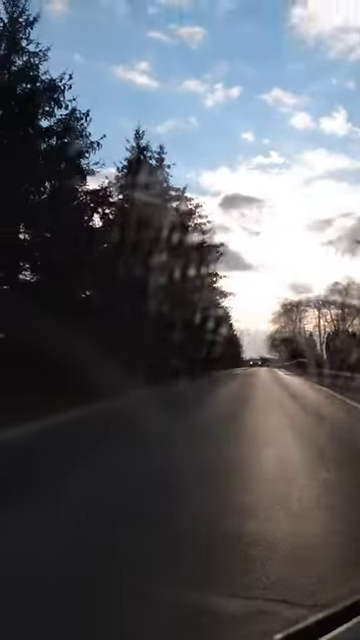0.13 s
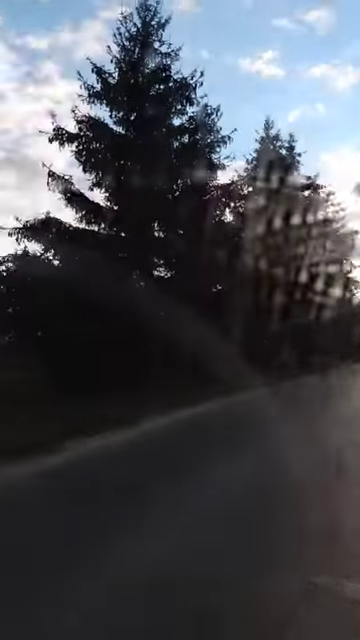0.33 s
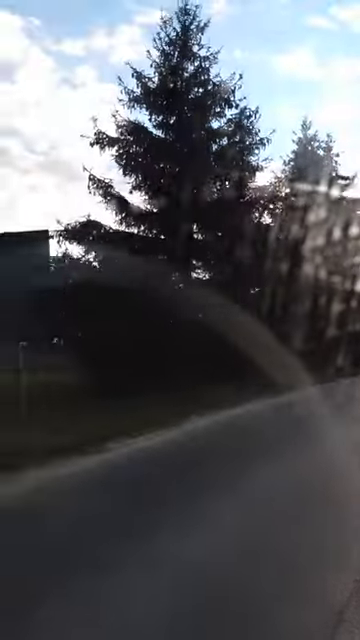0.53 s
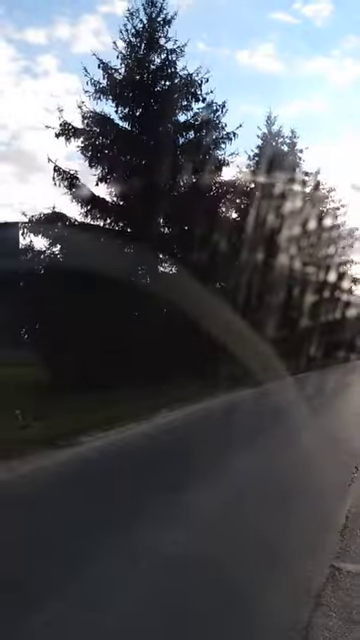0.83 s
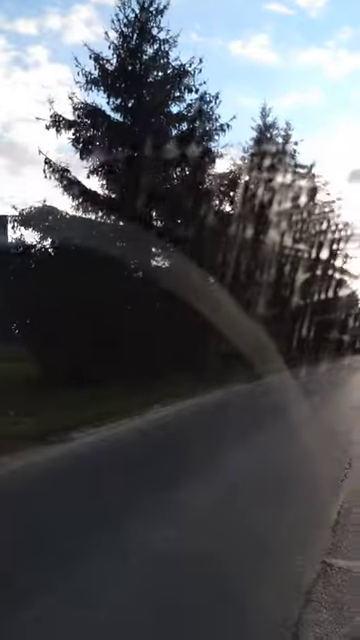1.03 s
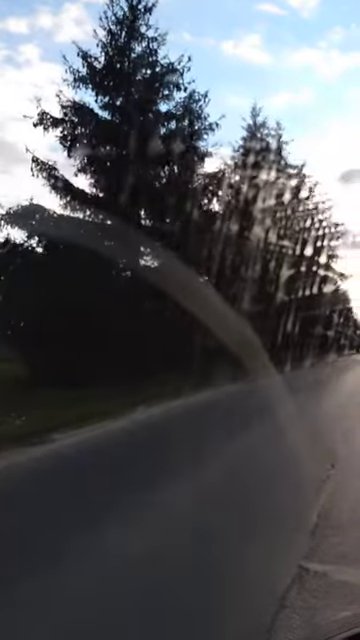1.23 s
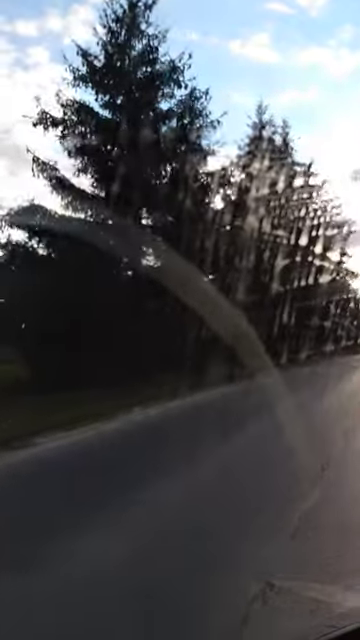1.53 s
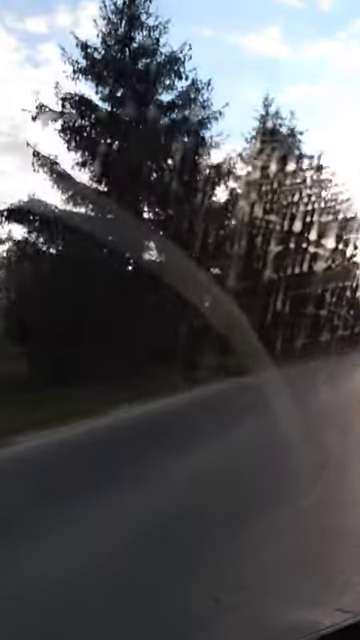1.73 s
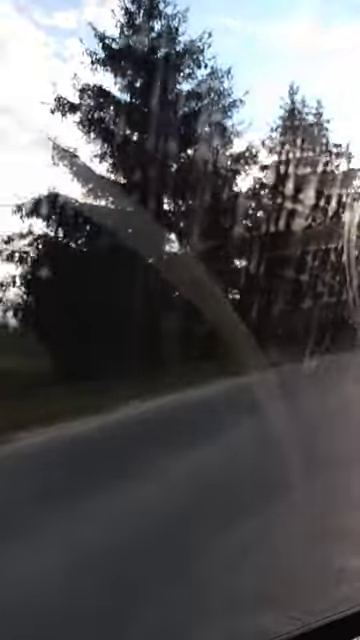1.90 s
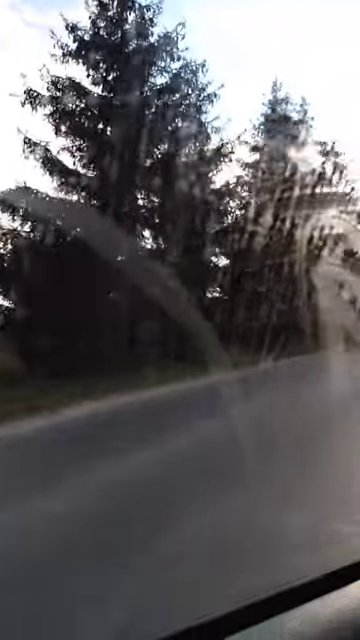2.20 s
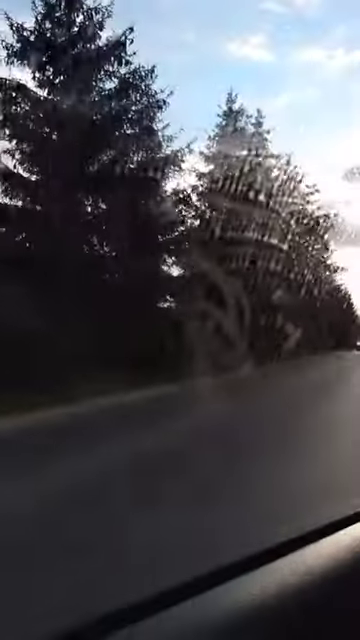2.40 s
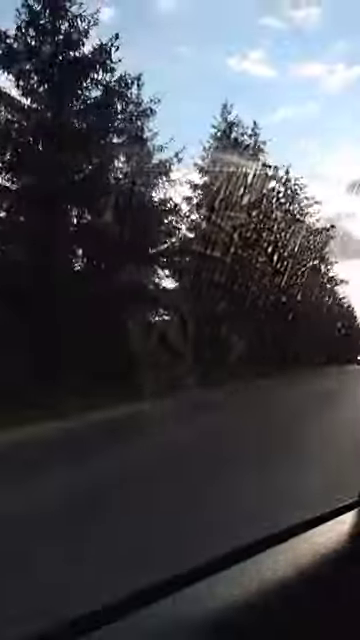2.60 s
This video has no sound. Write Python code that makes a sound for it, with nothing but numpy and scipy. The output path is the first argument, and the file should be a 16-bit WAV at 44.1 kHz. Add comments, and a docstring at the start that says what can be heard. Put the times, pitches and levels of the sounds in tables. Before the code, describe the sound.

Car engine booming low inside the cabin, idling then revving up, with one sharp click

```python
"""Inside a slow car, heard by a handheld phone. The engine idles at first, while cloth rustles (swishes of noise)
and dull jolts (short low thuds) pass. It then rises, eases and pulls again, as waves at multiples of its firing
rate that boom in the cabin. Small ticks (impulses with noisy tails) join in, and near two seconds one sharp
click (a sudden step). Road rumble and faint hiss (shaped noise), soft hums and tiny knocks last throughout."""
import sys
import numpy as np
from scipy import signal
from scipy.fft import rfft, irfft
from scipy.io import wavfile
from scipy.ndimage import uniform_filter1d

SR = 44100
rng = np.random.default_rng(int(sys.argv[2]) if len(sys.argv) > 2 else 0)


def bounce(signal):
    """Save signal as a 16-bit WAV file at the path given by the first command-line argument."""
    frames = np.transpose(np.atleast_2d(signal))
    limited = np.clip(frames, -1, 1)
    pcm = np.round(limited * 32767).astype(np.int16)
    wavfile.write(sys.argv[1], SR, pcm)


N = 121275

# The engine over time. Each row: time in seconds, firing rate in Hz, engine level in dB,
# level of the wave at the firing rate in dB, level of the wave at three times that rate in dB.
ENGINE_PATH = [(0.0, 31.3, -38, -34.5, -52), (0.1, 32.26, -48, -62, -54), (0.21, 30.82, -40, -67, -35.5),
               (0.27, 31.98, -36, -71, -60), (0.31, 31.73, -37, -50, -42), (0.36, 31.4, -47, -60, -46),
               (0.53, 30.3, -55, -68, -56), (0.65, 29.4, -55, -67, -55.5), (0.75, 28.96, -35.5, -54, -29),
               (0.79, 29.15, -45.5, -59, -65), (0.87, 30.74, -29, -53, -30), (0.96, 33.46, -38, -53, -45),
               (0.98, 34.33, -26, -35, -33.5), (1.111, 41.8, -34, -34.5, -42.5),
               (1.25, 44.9, -28, -33, -40.5), (1.401, 42.07, -31.5, -40, -38), (1.6, 34.5, -28, -36, -38),
               (1.7, 31.13, -32, -41, -38.5), (1.82, 30.68, -39, -42, -46.5), (1.88, 31.5, -40, -50, -42),
               (1.97, 33.5, -31, -40, -39), (2.06, 35.9, -25, -39, -34), (2.11, 37.2, -29, -38, -33),
               (2.16, 38.7, -23, -36, -36), (2.241, 40.99, -31, -37, -35), (2.38, 45, -24, -32, -40),
               (2.45, 47, -28, -32, -42), (2.53, 49.47, -23.5, -26.5, -42.5), (2.56, 51, -31.5, -30, -56.5),
               (2.63, 53.15, -29.5, -26, -40), (2.75, 54.08, -33.5, -30.5, -35.5)]
# Uneven firing. Each row: time in seconds, extra strength of the half multiples in dB.
UNEVEN_FIRING = [(0, -5), (.9, 11.5), (1.1, 2), (1.3, -1), (1.55, 6), (2.0, -0.5), (2.3, -2), (2.5, -2.5),
                 (2.6, 15), (2.75, 7.5)]
# The other engine waves. Each row: multiple of the firing rate, strength in dB added to the engine level,
# lag behind the pulse in radians.
ENGINE_MULTIPLES = [(1.5, -20.5, 0.13), (2, -1, 0.96), (2.5, -26, 0.13), (3.5, -28.5, .1), (4, -11.5, 2.06),
                    (4.5, -24, .1), (5, -18.5, 0.098), (5.5, -25, .1), (6, -22, 2.95), (7, -26.5, 0.089)]
# How the cabin colours those other waves. Each row: frequency in Hz, gain in dB.
CABIN_COLOUR = [(28, -20.5), (40, -9), (52, 6), (68, 0.5), (88, 2.5), (110, 0.5), (140, -1.5), (185, -1.5),
                (213, -9), (235, -1.5), (300, -0.5), (450, 1.5)]
PHASE_WANDER, WANDER_HZ = 0.17, 25  # rms radians per multiple; fastest wander
WAVER_DB, WAVER_HZ = 2.5, 12  # rms level waver; fastest waver of level and rate
JITTER = 0.0072  # rms waver of the rate, as a fraction of it
THIRD_LAG = 1.51  # radians behind the pulse
ENGINE_PAN_DB, ENGINE_LAG = -0.5, .12  # first port over second in dB; second behind first in radians

# One sharp click: time in seconds, height of the downward jump in dB, build-up and relaxing times in seconds.
CLICK_S, CLICK_DB, CLICK_BUILD_S, CLICK_RELAX_S = 1.987, -17.5, 0.0013, 0.0024

# Cloth rustles. Each row: centre in seconds, length with its fades in seconds, level in dB,
# brightest frequency in Hz, width in octaves, first port over second in dB.
CLOTH_RUSTLES = [(0.245, 0.19, -64.5, 10900, 0.36, -8.5), (0.411, 0.22, -56.5, 3950, 6.3, -3),
                 (0.415, 0.19, -61.5, 1330, 0.5, -3), (0.618, 0.16, -48.5, 11000, 0.68, -2),
                 (0.611, 0.078, -53, 5940, 0.49, -3), (0.638, 0.022, -56, 1750, 0.4, 0),
                 (0.69, .06, -65, 1800, .4, -2), (1.103, 0.13, -63.5, 10400, 0.48, -7),
                 (1.379, 0.08, -65, 2482, 1.2, -1), (1.438, 0.23, -68.5, 11200, 0.27, -10),
                 (1.534, 0.075, -56.5, 9230, 2, -3), (0.76, 0.17, -73, 1720, .5, -3),
                 (1.828, 0.1, -67, 1900, 0.4, -2.2), (1.96, 0.091, -66, 10750, 0.46, -9)]
RUSTLE_EDGE, RUSTLE_GRAIN_DB = 3.2, 2.2  # steepness of the fades; rms roughness in dB

# Small ticks. Each row: start in seconds, peak level before panning in dB, brightest frequency in Hz,
# width in octaves, first port over second in dB.
SMALL_TICKS = [(.8106, -44.5, 8000, 1.34, -3), (.83, -49, 2200, 1.02, -3), (.886, -47, 900, 1.27, -3),
               (.944, -48.5, 700, 0.97, -3), (1.0131, -39.5, 7214, 4.28, 0), (1.035, -43, 12500, 0.7, -7),
               (1.1842, -44, 7900, 1.02, -2.2), (1.188, -46, 2800, .6, -5), (1.009, -46, 900, 0.86, -1),
               (0.33, -61, 1360, 0.54, -3), (1.234, -42.5, 595, 0.46, -5), (1.7609, -44.5, 10780, 0.41, -7),
               (1.856, -51.5, 6785, 0.39, 0), (2.552, -58.5, 6003, 0.58, -5.5),
               (2.147, -45, 8980, 0.59, -9), (2.166, -44, 7200, 1.07, 3)]
TICK_TAIL_S, TICK_TAIL_DB = 0.016, -11  # time to fall 60 dB; tail's starting level against the impulse

# Dull jolts through the body. Each row: centre in seconds, length in seconds, level in dB,
# brightest frequency in Hz, width in octaves.
DULL_JOLTS = [(0.201, 0.052, -44, 62, 0.33), (0.53, 0.074, -41, 81, 0.27), (1.1, 0.16, -40, 118, 0.43),
              (1.38, 0.076, -49.5, 348, 0.16), (0.64, 0.038, -56.5, 760, 0.39), (.075, 0.05, -54, 420, 0.2),
              (0.28, 0.06, -39.5, 137, 0.52), (.358, 0.032, -43, 257, 0.74), (.39, 0.069, -49.5, 250, 0.4),
              (0.829, 0.022, -49, 473, 0.58), (1.1, 0.059, -48, 394, 0.67), (1.09, 0.024, -57, 640, 0.31),
              (2.07, 0.05, -51, 500, 0.6), (2.16, 0.11, -50, 440, .5), (2, 0.053, -48.5, 470, 0.2),
              (1.57, 0.038, -44, 164, 0.27), (1.85, 0.035, -51, 170, 0.34), (2.9, 0.16, -52.5, 300, 0.38)]

# Small knocks: how many per second at each port, overall level in dB, spread of sizes in dB,
# brightest frequency in Hz, width in octaves.
KNOCKS_PER_S, KNOCK_DB, KNOCK_SPREAD_DB, KNOCK_HZ, KNOCK_OCTAVES = 70, -66, 2.5, 650, .6

# Tone of the road rumble and hiss. Each row: frequency in Hz, relative strength per Hz in dB.
ROAD_TONE = [(14, -40.5), (24, -28), (36, -15.5), (55, -10), (88, -9.5), (130, -14), (190, -22),
             (300, -21.5), (440, -28.5), (620, -40), (800, -44.5), (1100, -49), (1700, -48), (2600, -52),
             (4500, -56.5), (7000, -60.5), (10500, -56.5), (15800, -55)]
ROAD_DB = -37.5  # overall level
# Road swells; only the movement around each column's average is used. Each row: time in seconds,
# then levels in dB of the deep rumble, the low rumble, the middle, the upper middle and the treble.
ROAD_SWELLS = [(0.0, -62.5, -50, -59.5, -71, -68), (0.21, -66.5, -54.5, -55.5, -69.5, -68),
               (0.42, -66.5, -48, -52, -64, -64.5), (0.53, -67.5, -54, -60, -68, -64),
               (0.66, -62, -46.5, -52.5, -64, -65.5), (0.78, -68.5, -45, -54.5, -68.5, -68),
               (0.9, -58.5, -47, -48.5, -75, -70.5), (1.07, -56, -46, -47.5, -67.5, -66),
               (1.28, -78, -45, -52, -67, -67.5), (1.51, -66.5, -48.5, -51, -67.5, -65.5),
               (1.64, -65, -46, -49, -68.5, -69.5), (1.77, -52, -42.5, -51.5, -68, -69),
               (1.89, -57, -47, -55.5, -68.5, -66.5), (2.03, -59, -48, -49, -71.5, -67),
               (2.15, -63, -45.5, -48, -72, -69), (2.3, -61, -41, -51.5, -67.5, -68.5),
               (2.45, -62, -38.5, -52.5, -72, -72), (2.75, -58, -40, -52, -63.5, -69.5)]
# The frequency in Hz where each of those five levels rules, in one list.
SWELL_HZ = [75, 180, 500, 1800, 6000]
PATCH_DB = 1.5  # rms patchiness of the noise
# How alike the road is at the two ports. Each row: frequency in Hz, likeness from 0 to 1.
PORT_LIKENESS = [(60, 1), (130, 0.94), (290, 0.96), (640, 0.53), (1400, 0.09), (3100, 0.13), (6800, 0.042),
                 (15000, .05)]
# Which side the road leans to. Each row: frequency in Hz, first port over second in dB.
ROAD_LEAN = [(60, 0), (250, -0.5), (640, 0), (1400, -5), (3100, -0.5), (6000, -1.5), (9500, -4),
             (12500, -1.3), (15500, 4)]
# Steady hums of the cabin. Each row: frequency in Hz, width in Hz, level in dB.
CABIN_HUMS = [(241.4, 13, -53), (182.3, 9.4, -51)]

MIC_LOW_HZ, EDGE_HZ = 30.6, 15830  # below the first and above the second the sound fades out


def amp(db):
    """Turn decibels into a plain multiplier."""
    return 10 ** (np.asarray(db) / 20)


def evened(x):
    """Scale a sound to an rms of 1."""
    return x / np.sqrt(np.mean(x ** 2) + 1e-20)


def read(points, hz):
    """Read a curve at any frequency, along a log-frequency axis."""
    f, value = np.transpose(points)
    return np.interp(np.log(hz + 1), np.log(f + 1), value)


def add(mix, s, sound):
    """Lay a sound into the mix from time s, cut off at the end."""
    part = mix[:, round(s * SR):][:, :sound.shape[1]]
    part += sound[:, :part.shape[1]]


def drift(top_hz):
    """Slow random wander of rms 1: 24 slow waves with random starting points."""
    t = np.arange(0, N + 256, 256) / SR
    f = np.geomspace(top_hz / 12, top_hz, num=24)
    start = rng.random(24)
    waves = np.sin(2 * np.pi * (f * t[:, None] + start))
    return np.interp(np.arange(N) / SR, t, evened(waves.sum(1)))


def coloured(x, hz, octaves):
    """Keep a bell-shaped band on a log-frequency axis."""
    f = np.fft.rfftfreq(x.shape[-1], 1 / SR) + 1
    bell = np.exp(-.5 * abs(np.log2(f / hz) / octaves) ** 3)
    return irfft(rfft(x) * bell, x.shape[-1])


def panned(pan_db):
    """Gains of the two ports, pan_db apart."""
    return amp([[pan_db / 2], [-pan_db / 2]])


def engine():
    """Firing pulses make waves at multiples of the firing rate; the cabin colours all but the first and third."""
    s, rate, level_db, lowest_db, third_db = np.transpose(ENGINE_PATH)
    t = np.arange(N) / SR
    rate = np.interp(t, s, rate) * (1 + JITTER * drift(WAVER_HZ))
    turn = 2 * np.pi * np.cumsum(rate) / SR
    ports = np.array([[ENGINE_LAG / 2], [-ENGINE_LAG / 2]])
    lowest_gain = amp(np.interp(t, s, lowest_db) + WAVER_DB * drift(WAVER_HZ))
    out = lowest_gain * np.cos(turn + ports / 2)  # only half the lag between ports here
    third_gain = amp(np.interp(t, s, third_db) + WAVER_DB * drift(WAVER_HZ))
    out += third_gain * np.cos(3 * turn - THIRD_LAG + ports)
    uneven_db = np.interp(t, *np.transpose(UNEVEN_FIRING))
    for k, db, lag in ENGINE_MULTIPLES:
        cabin_db = read(CABIN_COLOUR, k * rate)
        gain = amp(np.interp(t, s, level_db) + db + cabin_db + WAVER_DB * drift(WAVER_HZ))
        gain *= amp((k % 1 > 0) * uneven_db)  # half multiples only
        wandering_turn = turn + PHASE_WANDER * drift(WANDER_HZ)
        out += gain * np.cos(k * wandering_turn - lag + ports)
    return np.sqrt(2) * out * panned(ENGINE_PAN_DB)  # sqrt(2) makes the wave levels rms


def click():
    """The signal builds up, jumps down at once and relaxes, alike at both ports."""
    t = np.arange(N) / SR - CLICK_S
    before = np.exp(-abs(t) / CLICK_BUILD_S)
    after = -np.exp(-abs(t) / CLICK_RELAX_S)
    return amp(CLICK_DB) / 2 * np.where(t < 0, before, after)


def rustle(centre, length, db, hz, octaves, pan_db, noise):
    """Cloth makes a grainy swish of noise, partly different at each port."""
    u = np.linspace(-1, 1, len(noise))
    shape = np.exp(-abs(u * len(noise) / SR / length) ** RUSTLE_EDGE * 2 ** RUSTLE_EDGE)
    grain = amp(RUSTLE_GRAIN_DB * evened(uniform_filter1d(noise[:, 3], size=120)))
    swish = coloured(noise[:, :2].T + 0.08 * noise[:, 2], hz, octaves)
    return amp(db) * evened(swish * grain) * shape * panned(pan_db)


def tick(db, hz, octaves, pan_db, noise):
    """One short impulse with a brief noisy tail."""
    t = np.arange(len(noise)) / SR
    blow = amp(TICK_TAIL_DB - 60 * t / TICK_TAIL_S) * noise.T
    blow[:, 0] = 1  # the impulse
    blow = coloured(np.roll(blow, 256, axis=1), hz, octaves)  # room for the filter to ring before it
    return amp(db) * blow / abs(blow).max() * panned(pan_db)


def jolt(centre, length, db, hz, octaves, noise):
    """A short dull thud: a band of noise that swells and fades, partly shared by both ports."""
    t = (np.arange(len(noise)) - len(noise) / 2) / SR
    thud = coloured(noise[:, 0] + 0.46 * noise[:, 1:].T, hz, octaves)
    return amp(db) * evened(thud) * np.exp(-(2 * t / length) ** 2)


def knocks():
    """The trim knocks at random: impulses of mixed size, mostly different at each port."""
    size = amp(KNOCK_SPREAD_DB * np.minimum(rng.exponential(1, (2, N)), 4))
    hits = size * (rng.random((2, N)) < KNOCKS_PER_S / SR)
    both = hits + 0.092 * hits[::-1]  # a little of each port reaches the other
    return amp(KNOCK_DB) * evened(coloured(both, KNOCK_HZ, KNOCK_OCTAVES))


def road():
    """Road rumble and hiss: patchy noise whose five ranges swell on their own, built in short frames."""
    frames, hz = N // 256 + 9, np.fft.rfftfreq(1024, 1 / SR)
    a, b, c, d, patches = rng.standard_normal((frames, 513, 5)).T
    patches = uniform_filter1d(patches, size=14, axis=0)  # smooth over frequency
    patches = evened(uniform_filter1d(patches, size=10, axis=1))  # smooth over time

    s, *levels = np.transpose(ROAD_SWELLS)
    t = (np.arange(frames) - 4) * 256 / SR
    # how much each of the five levels counts at each frequency
    shares = np.transpose([read(np.transpose([SWELL_HZ, one]), hz) for one in np.eye(len(levels))])
    swell = shares @ [np.interp(t, s, v - np.mean(v)) for v in levels]

    same = np.clip(read(PORT_LIKENESS, hz), -1, 1)[:, None]
    first = a + 1j * b
    second = same * first + np.sqrt(1 - same ** 2) * (c + 1j * d)
    lean = read(ROAD_LEAN, hz)[:, None] / 2
    tone = read(ROAD_TONE, hz)[:, None]
    z = np.array([first, second])
    z *= amp(tone + PATCH_DB * patches + swell + np.array([lean, -lean]))
    noise = signal.istft(z, nperseg=1024, noverlap=768)[1]
    return amp(ROAD_DB) * evened(noise[:, 1024:N + 1024])


def hums():
    """Cabin hums: narrow bands of noise at fixed pitches, mostly alike at both ports."""
    f, out = np.fft.rfftfreq(N, 1 / SR), 0
    for hz, width, db in CABIN_HUMS:
        noise = rng.standard_normal((2, N))
        peak = 1 + ((f - hz) / width * 2) ** 2
        out = out + amp(db) * evened(irfft(rfft(noise[0] + .3 * noise) / peak, N))
    return out


def scene():
    """Mix the lasting sounds, then place each rustle, tick and jolt."""
    mix = engine() + road() + hums() + click() + knocks()
    for row, noise in zip(CLOTH_RUSTLES, rng.standard_normal((len(CLOTH_RUSTLES), 8192, 4))):
        add(mix, row[0] - 4096 / SR, rustle(*row, noise))
    for row, noise in zip(SMALL_TICKS, rng.standard_normal((len(SMALL_TICKS), 4096, 2))):
        add(mix, row[0] - 256 / SR, tick(*row[1:], noise))
    for row, noise in zip(DULL_JOLTS, rng.standard_normal((len(DULL_JOLTS), 6000, 3))):
        add(mix, row[0] - 3000 / SR, jolt(*row, noise))
    return mix


def record(dry):
    """The microphone drops the deepest bass; then a steep filter removes the highest treble."""
    high_pass = signal.butter(2, MIC_LOW_HZ, "high", fs=SR, output="sos")
    lean = signal.sosfiltfilt(high_pass, dry, padlen=4000)
    taps = signal.firwin(511, EDGE_HZ, window=("kaiser", 9), fs=SR)[None]
    return signal.oaconvolve(np.pad(lean, ((0, 0), (255, 255)), "edge"), taps, "valid")


dry = scene()
out = record(dry)
bounce(out)
```